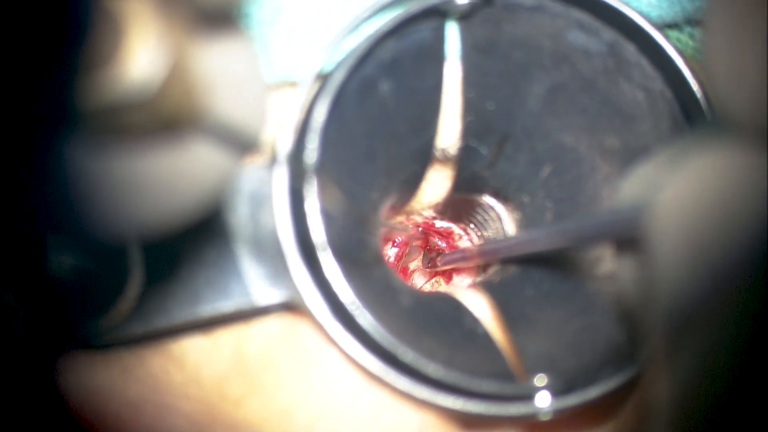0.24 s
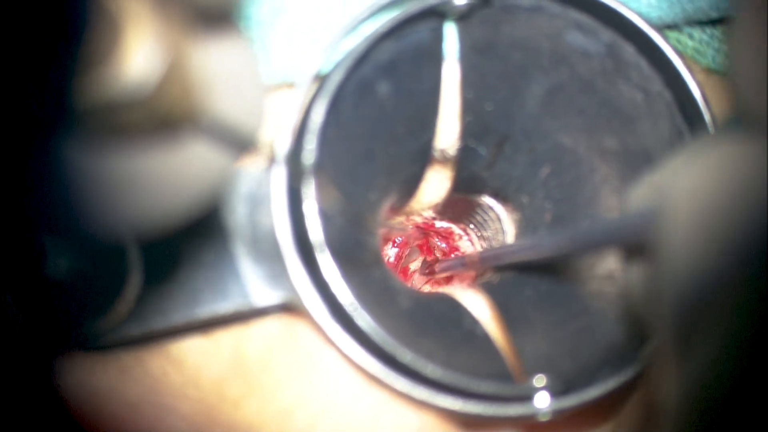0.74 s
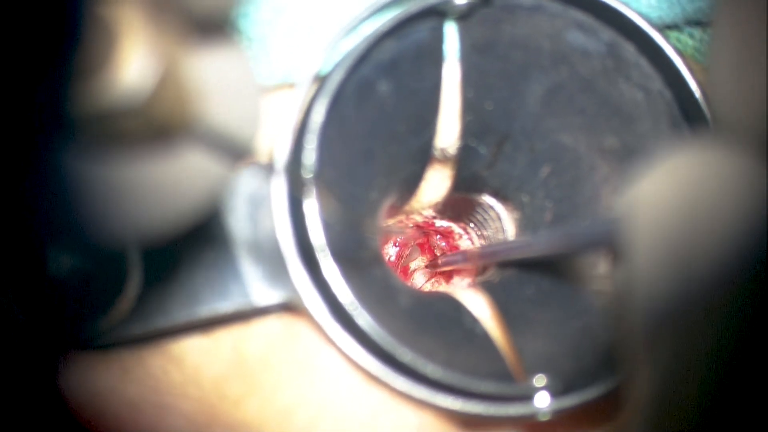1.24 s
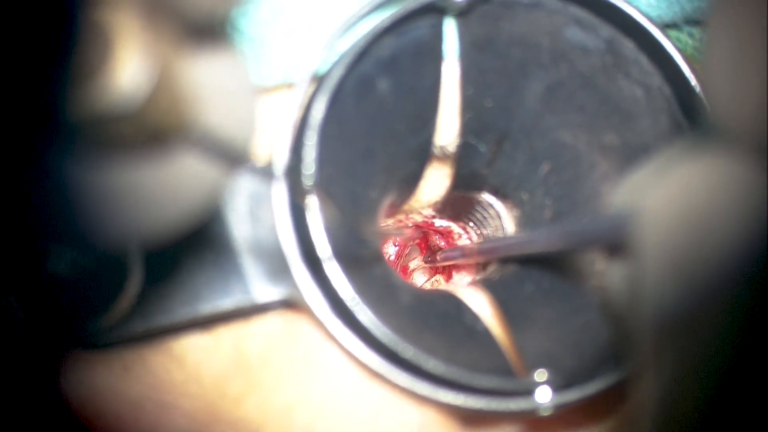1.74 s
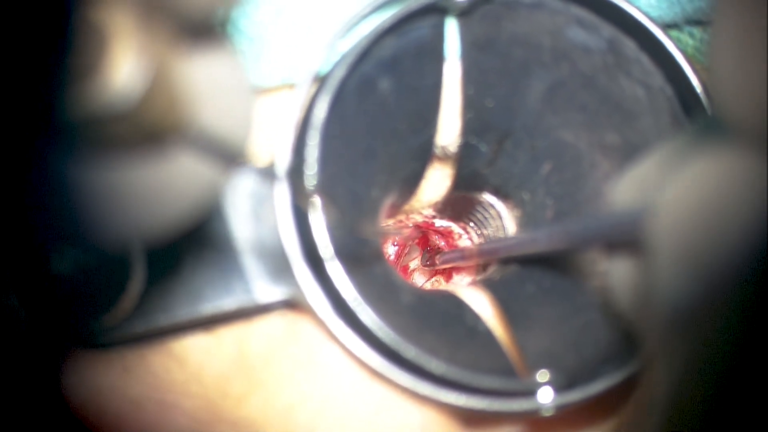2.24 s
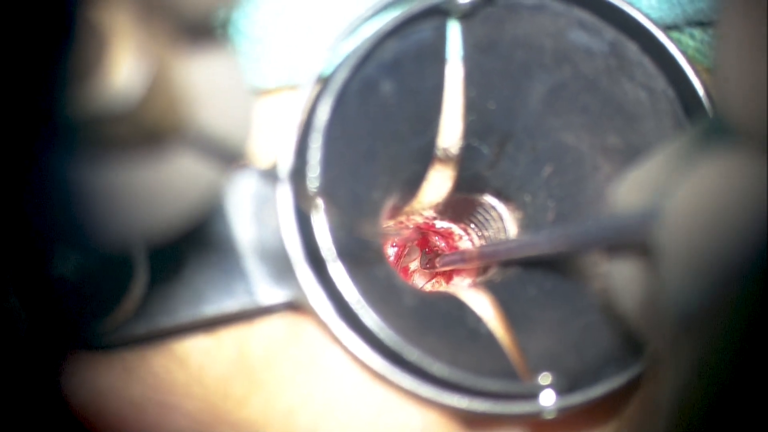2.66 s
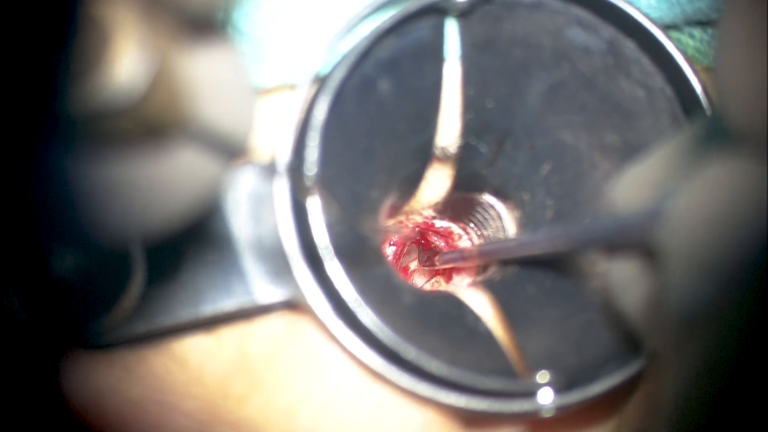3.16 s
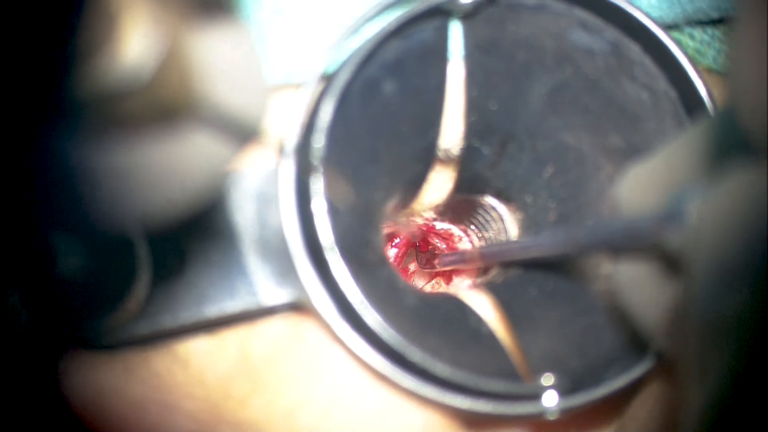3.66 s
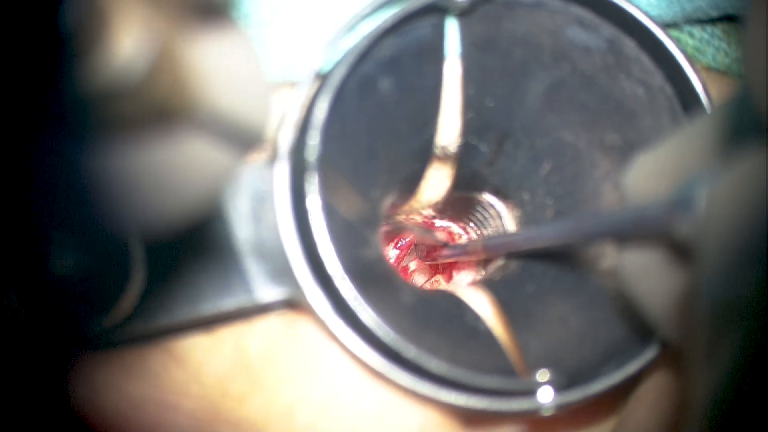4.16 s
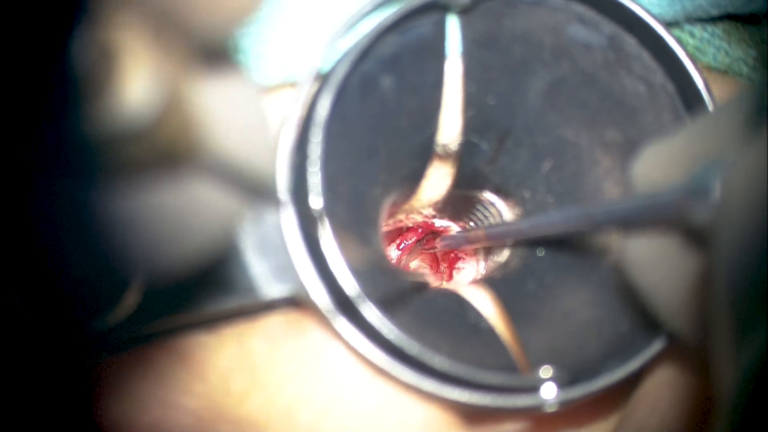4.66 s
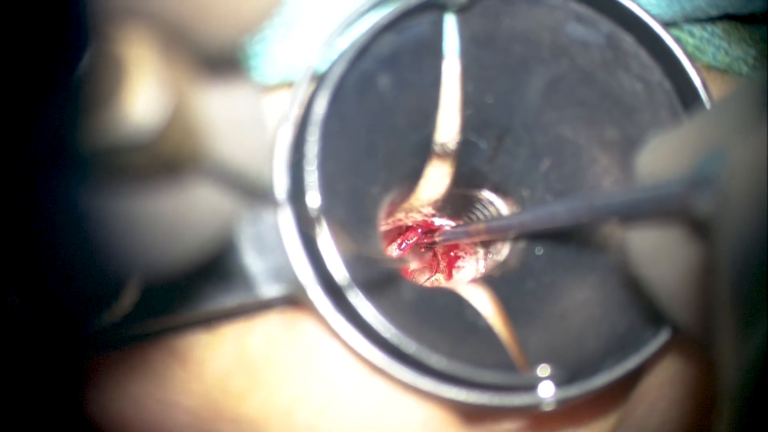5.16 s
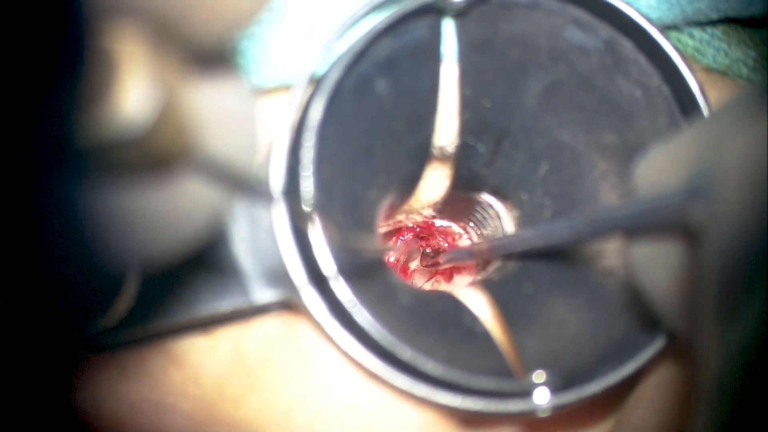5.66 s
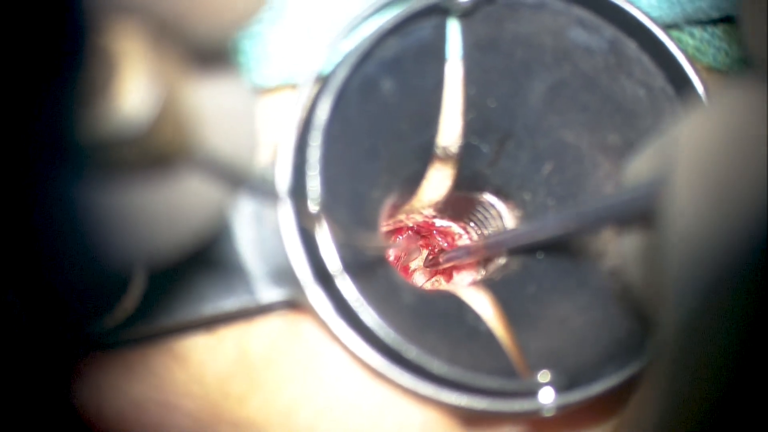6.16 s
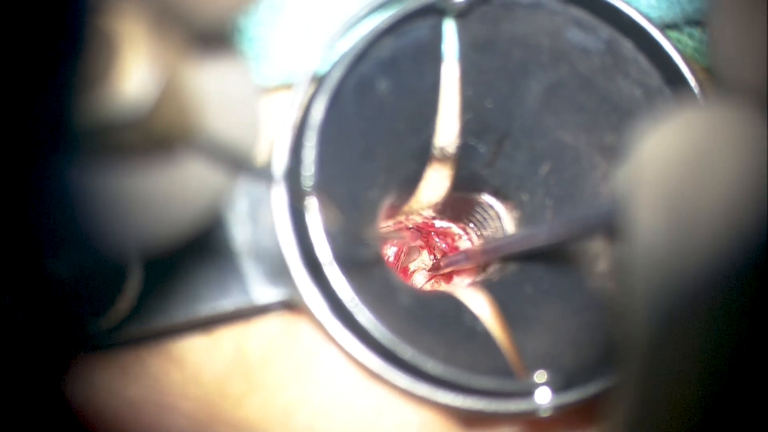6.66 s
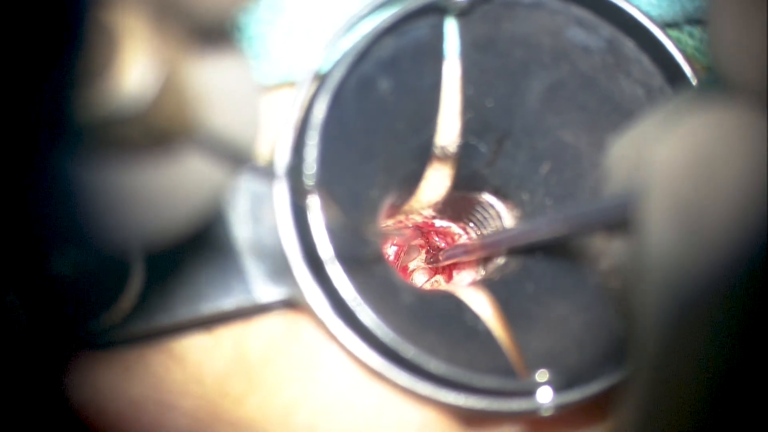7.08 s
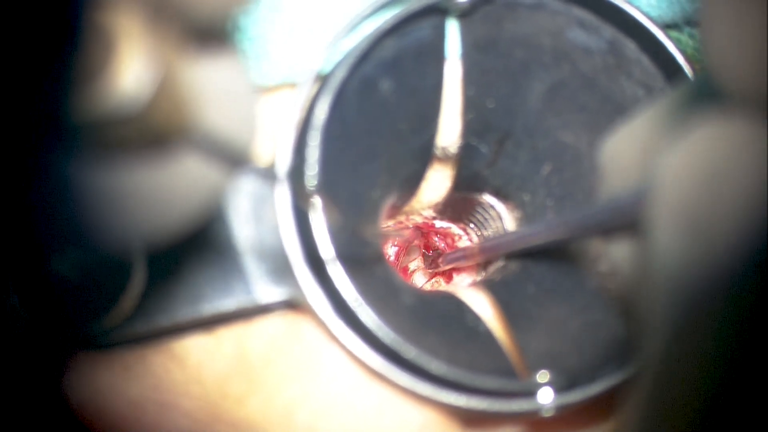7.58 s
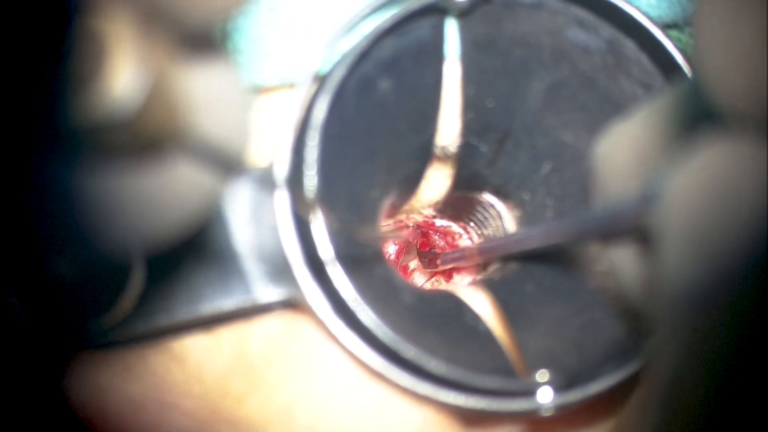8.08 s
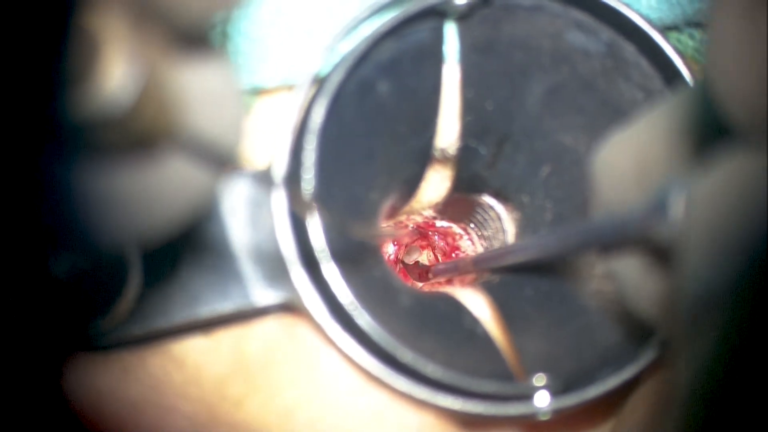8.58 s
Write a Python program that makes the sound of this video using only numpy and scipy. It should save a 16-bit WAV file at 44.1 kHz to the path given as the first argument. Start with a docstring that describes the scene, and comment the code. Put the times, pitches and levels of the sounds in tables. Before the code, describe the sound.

A thin surgical suction tube hisses in irregular close-up bursts, with wet snaps, ticks, brief whistles and soft thumps over steady room ventilation.

```python
"""Suction tube in an ear canal

A thin steel suction tube works in an ear canal, heard from very close by in an operating room.
Noise through resonances that change with how the tip sits makes the hiss; narrow gliding noise whistles.
Low coloured noise makes the rush of each draw; resonated random drops spatter.
Dying sines and noise puffs snap, pressure steps tick and low sines thump over steady ventilation."""
import sys
import numpy as np
from scipy import signal
from scipy.fft import rfft, irfft, next_fast_len
from scipy.io import wavfile
from scipy.ndimage import uniform_filter1d

SR = 44100
rng = np.random.default_rng(int(sys.argv[2]) if len(sys.argv) > 2 else 0)


def store_pcm(level_fs):
    """Save levels as 16-bit WAV."""
    pcm = np.round(np.clip(level_fs, -1, 1) * 32767).astype(np.int16)
    wavfile.write(sys.argv[1], SR, np.atleast_2d(pcm).T)


N = 388962
TINY = 1e-18  # keeps recursive filters clear of denormals


def from_db(db):
    """Decibels to amplitude gain."""
    return 10 ** (np.asarray(db) / 20)


def rms_one(x):
    """Scale to unit power."""
    return x / np.sqrt(np.mean(x ** 2) + 1e-20)


def cut(x, hz, kind, order=2):
    """Butterworth low- or high-pass."""
    sos = signal.butter(order, min(hz, .45 * SR), kind, fs=SR, output="sos")
    return signal.sosfilt(sos, x)


def drift(rate_hz):
    """Low-passed noise, rms 1; the filter settles for 1 s first."""
    return rms_one(cut(rng.standard_normal(N + SR), rate_hz, "low")[SR:])


def coloured_noise(spectrum):
    """Noise shaped by a spectrum, high-passed at 16 Hz, rms 1."""
    hz, density_db = np.transpose(spectrum)
    size = next_fast_len(N)
    bins_hz = np.maximum(np.arange(size // 2 + 1) * SR / size, 1)
    gain = from_db(np.interp(np.log(bins_hz), np.log(hz), density_db))
    noise = irfft(rfft(rng.standard_normal(size)) * gain, size)[:N]
    return rms_one(cut(noise, 16, "high"))


def resonate(x, hz, width_hz):
    """Two-pole resonance with gain 1 at its top."""
    r = np.exp(-np.pi * width_hz / SR)
    b = np.array([1, 0, -1]) * (1 - r * r) / 2
    a = [1, -2 * r * np.cos(2 * np.pi * hz / SR), r * r]
    return signal.lfilter(b, a, x)


def ring(t, hz, t60_s):
    """Sine that dies by 60 dB in t60_s."""
    return np.sin(2 * np.pi * hz * t) * from_db(-60 * t / t60_s)


def add(track, start_s, sound):
    """Mix a sound into the track from start_s on."""
    start = max(round(start_s * SR), 0)
    track[start:start + len(sound)] += sound[:max(N - start, 0)]


# ventilation spectrum: hz, density_db (relative, per Hz)
VENTILATION = [(12, -39), (20, -0.5), (63, -4.5), (153, -11.5), (203, -8), (227, -13), (254, -8.5),
               (408, -7.5), (456, -13), (524, -12), (1180, -14.5), (1510, -18.5), (1690, -19), (2500, -26),
               (15800, -32.5)]
# swell of the low rumble: time_s, gain_db
RUMBLE = [(0, -2.5), (.45, -7), (.75, 2), (3.3, -0.5), (5.2, 3.5), (7.0, 1.5), (8.82, 2)]


def ventilation(level_db, rumble_hz, waver_db):
    """Steady air handling as coloured noise; below rumble_hz it swells and sinks."""
    air = from_db(level_db) * coloured_noise(VENTILATION)
    time_s, gain_db = np.transpose(RUMBLE)
    swell_db = np.interp(np.arange(N) / SR, time_s, gain_db) + waver_db * np.tanh(drift(3.4))
    rumble = cut(air, rumble_hz, "low", order=3) * from_db(swell_db)
    return cut(air, rumble_hz, "high", order=3) + rumble


# air drawn each time the tip comes clear: start_s, length_s, opening_s, closing_s, hiss_db,
# swell_db (start to end), treble_db (relative to hiss), rush_db (low turbulence)
DRAWS = [(0.468, 0.08, 0.0066, 0.025, -59, 3, -9, -72), (0.675, 0.057, 0.008, 0.025, -55.5, -1, -7, -66),
         (0.717, 0.1, 0.02, 0.02, -65, 0, -5, -68), (0.793, 0.13, 0.055, 0.041, -42.6, -4, 2, -49.5),
         (0.883, 0.23, 0.19, 0.043, -40.5, 10.5, 5.5, -54.8),
         (1.088, 0.15, 0.03, 0.041, -36.5, -10, 8.5, -41), (1.275, 0.065, 0.0055, 0.03, -52, -18, -3, -52),
         (1.332, 0.11, 0.022, 0.025, -42.5, 16, 0.5, -45.5), (1.407, 0.22, 0.068, 0.046, -32.5, 3, 1, -41),
         (1.616, 0.088, 0.014, 0.033, -44.3, 13, -0.5, -44.5),
         (1.662, 0.23, 0.055, 0.045, -36, 18.5, 2.5, -39),
         (1.872, 0.26, 0.072, 0.086, -38.9, 2, 0.3, -41.5), (2.104, 0.068, 0.008, 0.013, -61, 6, 2, -58.3),
         (2.162, 0.047, 0.0038, 0.024, -33, 19, 5.5, -38),
         (2.191, 0.051, 0.019, 0.0095, -32.5, -6, 1, -32.5),
         (2.237, 0.142, 0.007, 0.012, -56, -7.5, -1.5, -48),
         (2.44, 0.073, 0.006, 0.049, -58, 6, -0.2, -49.5),
         (2.503, 0.28, 0.0032, 0.091, -43, -18, -3.5, -44),
         (2.689, 0.23, 0.076, 0.049, -37.0, 6, -3.5, -41),
         (2.885, 0.14, 0.052, 0.032, -33.5, -19, 1.9, -40), (3.225, 0.26, 0.15, 0.014, -48.5, 10, 1.5, -57),
         (3.457, 0.057, 0.013, 0.037, -38, 6.1, 7, -45),
         (3.501, 0.16, 0.026, 0.012, -38.5, -8.5, 1.6, -51.5),
         (3.619, 0.17, 0.061, 0.058, -41.5, -4.4, 7, -50.5), (3.753, 0.075, 0.01, 0.012, -53.5, -2, 2, -62),
         (3.797, 0.058, 0.005, 0.025, -45, -4, 3, -54), (3.849, 0.058, 0.003, 0.012, -55, -5, 1.4, -57),
         (3.888, 0.16, 0.098, 0.016, -38.5, 4, 2.5, -47.9), (4.04, 0.19, 0.013, 0.098, -42, 10, 5.5, -53.5),
         (4.215, 0.38, 0.14, 0.242, -41.5, -10.5, 0, -49), (4.568, 0.15, 0.042, 0.015, -50.5, -2, -4, -57),
         (4.683, 0.15, 0.096, 0.033, -39.5, -21, -1, -60), (4.823, 0.06, 0.027, 0.03, -37.5, 6, 0.5, -48),
         (4.859, 0.33, 0.032, 0.14, -37.5, 8, 2.5, -50.5), (5.186, 0.033, 0.011, 0.011, -58, 0, 2, -59),
         (5.205, 0.34, 0.021, 0.082, -44, -5.5, 2.5, -55), (5.483, 0.25, 0.009, 0.15, -42.5, 5, -5.5, -60),
         (5.666, 0.072, 0.016, 0.015, -42, 2, -4.5, -59),
         (5.708, 0.17, 0.066, 0.034, -41, -11.2, -7.5, -58),
         (5.826, 0.16, 0.035, 0.056, -45, 3.5, -9.5, -63),
         (5.972, 0.41, 0.034, 0.012, -62, -17, -5.5, -63.6), (6.347, 0.13, 0.09, 0.03, -52.5, 6, -6, -70),
         (6.494, 0.26, 0.107, 0.08, -52, 3.9, -6.5, -60.4),
         (7.406, 0.11, 0.022, 0.055, -54, -2.5, -7, -61.5),
         (7.859, 0.092, 0.066, 0.02, -49.5, 12.2, -11, -59),
         (8.019, 0.24, 0.042, 0.023, -42, -5.5, 3.4, -61),
         (8.241, 0.072, 0.029, 0.01, -42, -15.0, 3.5, -49), (8.299, 0.069, 0.018, 0.027, -39, -3, 0.5, -52),
         (8.343, 0.39, 0.033, 0.096, -41.5, -8, 1.2, -47.5)]
HISS_LAW, TREBLE_LAW, RUSH_LAW = 1.45, 2.03, 1.4  # amplitude grows as this power of the gap
LEAK_HISS_DB, LEAK_TREBLE_DB, LEAK_RUSH_DB = -72, -73, -66  # air seeping in between draws


def airflow():
    """The gap opens, holds and closes on each draw; gives hiss, treble and low rush in dB."""
    t = np.arange(N) / SR
    leaks_db = (LEAK_HISS_DB, LEAK_TREBLE_DB, LEAK_RUSH_DB)
    hiss_power, treble_power, rush_power = (np.full(N, from_db(db) ** 2) for db in leaks_db)
    for start_s, length_s, opening_s, closing_s, hiss_db, swell_db, treble_db, rush_db in DRAWS:
        age_s = t[t < length_s]
        gap = np.clip(np.minimum(age_s / opening_s, (length_s - age_s) / closing_s), 0, 1)
        swell = from_db(swell_db * (age_s / length_s - .5))
        add(hiss_power, start_s, (swell * from_db(hiss_db) * gap ** HISS_LAW) ** 2)
        add(treble_power, start_s, (swell * from_db(hiss_db + treble_db) * gap ** TREBLE_LAW) ** 2)
        add(rush_power, start_s, (swell * from_db(rush_db) * gap ** RUSH_LAW) ** 2)
    return 10 * np.log10([hiss_power, treble_power, rush_power])


def gurgle(hiss_db, low_db, depth_db, per_s, relax_s, dry_db):
    """Fluid films burst in the opening: flow jumps and relaxes, more as low rush outweighs hiss."""
    wet = np.clip(0.5 - (hiss_db - low_db) / dry_db, 0, 1)
    bursts = rng.uniform(.5, 1, N) * (rng.random(N) < per_s / SR)
    decay = np.exp(-1 / (relax_s * SR))
    surge = np.tanh(signal.lfilter([1], [1, -decay], bursts + TINY))
    return depth_db * wet * rms_one(surge - surge.mean())


def tube_noise(modes, broad_db, low_hz, size, shift_pct=0):
    """Eddies at the tip drive each resonance, steep-sided; some of their rush escapes uncoloured."""
    out = from_db(broad_db) * rng.standard_normal(size)
    for hz, width_hz, gain_db in modes:
        centre_hz = hz * (1 + shift_pct / 100)
        once = resonate(rng.standard_normal(size), centre_hz, width_hz)
        out = out + from_db(gain_db) * resonate(once, centre_hz, width_hz)
    return cut(out, low_hz, "high", order=4)


# resonances of tube and ear canal for each way the tip sits: hz, width_hz, gain_db
FREE = [(2200, 235, 6.5), (2545, 590, 10), (3850, 890, -1.5), (4750, 820, -2.5), (5155, 300, 3.5),
        (6550, 450, -15), (8320, 900, -15.5), (9500, 1300, -20), (10180, 370, -21.5), (12000, 630, -20.5),
        (13000, 800, -21)]
DIPPED = [(2020, 500, -4), (2436, 500, 0.5), (3475, 850, -6), (4940, 460, -4), (6850, 1300, -12),
          (8550, 3000, -3), (9700, 2000, -14), (12080, 1500, -6.5), (13020, 750, 5), (15600, 900, -7)]
PRESSED = [(1900, 355, -2), (3650, 1900, -6), (5130, 880, -1), (6800, 1500, -2.5), (8510, 1700, 0.5),
           (9440, 3100, -2), (12700, 1100, -7), (13300, 1300, 7), (15300, 1800, -4)]
GRAZING = [(1874, 150, 2.5), (2220, 540, -5), (3950, 2000, -7), (5350, 400, -5), (6760, 840, -5.5),
           (8340, 1300, 0), (9830, 2000, -2.5), (12250, 1000, -2), (13550, 800, -0.5), (15400, 1200, -12)]
CUPPED = [(1890, 390, 3), (3960, 1100, -6.5), (5230, 720, 2), (6860, 1700, -2), (8200, 800, -3),
          (9700, 1000, -3.5), (12500, 900, -9), (13300, 590, 5), (15300, 1300, -11)]
PINCHED = [(2080, 460, -29), (4600, 1400, -6), (5600, 800, -6.5), (6700, 1300, -5), (8300, 510, 11),
           (9300, 900, 2), (11700, 1500, -3), (13500, 1500, -2), (15600, 800, -17)]


def seat_noise(modes, shift_pct, size):
    """Tube noise with the uncoloured rush and low edge of each way the tip sits."""
    if modes is FREE:
        return tube_noise(modes, -32.0, 1330, size, shift_pct)
    if modes is DIPPED:
        return tube_noise(modes, -15.0, 1900, size, shift_pct)
    if modes is PRESSED:
        return tube_noise(modes, -18.5, 840, size, shift_pct)
    return tube_noise(modes, -10.0, 1350, size, shift_pct)


# how the tip sits from each moment on: start_s, resonances, shift_pct (upward)
SEATING = [(0, GRAZING, -0.13), (1.02, PINCHED, -0.47), (1.224, PRESSED, 0.78), (1.519, DIPPED, 0.25),
           (2.17, PRESSED, -1.5), (2.451, PRESSED, -0.83), (3.011, FREE, -0.34), (3.387, GRAZING, -0.36),
           (3.461, PINCHED, 1), (3.57, GRAZING, -0.24), (3.94, CUPPED, -0.25), (4.819, DIPPED, -.5),
           (5.33, FREE, -0.36), (7.0, FREE, 0.23), (8.2, DIPPED, 0.6), (8.35, FREE, 0.19)]


def hiss(hiss_db, treble_db, flutter_db, flutter_hz, treble_hz):
    """The intake jet: brighter as it speeds up, fluttering as fluid crosses the opening."""
    body, top = np.zeros(N), np.zeros(N)
    fade = SR // 60
    ends_s = [start_s for start_s, _, _ in SEATING[1:]] + [N / SR]
    for (start_s, modes, shift_pct), end_s in zip(SEATING, ends_s):
        size = max(round((end_s - start_s) * SR), fade) + fade
        air = seat_noise(modes, shift_pct, size)
        to_edge = np.minimum(np.arange(size), np.arange(size)[::-1])
        cross_fade = np.sqrt(np.minimum(to_edge / fade, 1))
        add(body, start_s, cross_fade * rms_one(cut(air, treble_hz, "low", order=7)))
        add(top, start_s, cross_fade * rms_one(cut(air, treble_hz, "high", order=7)))
    level = from_db(hiss_db + flutter_db * drift(flutter_hz))
    return level * (body + from_db(treble_db) * top)


# low rush and its bass: hz, density_db (relative, per Hz)
TURBULENCE = [(20, -15), (120, -8.5), (350, -2.5), (700, -5.5), (1000, -8), (1350, -5.5), (1700, -11.5),
              (2600, -26), (5000, -49)]
BUFFET = [(20, -14), (60, -4), (170, 0), (300, -7.5), (600, -10.5), (1500, -38.5)]


def turbulence(low_db, lumpy_db, buffet_from_db, buffet_growth, free_tip_db):
    """Unsteady draught gives a lumpy low rush; its bass grows faster, but is weaker at a free tip."""
    free = np.zeros(N)
    for start_s, modes, _ in SEATING:
        free[max(round(start_s * SR), 0):] = modes is FREE
    free = uniform_filter1d(free, size=900)
    buffet_db = low_db + buffet_growth * (low_db - buffet_from_db) + free_tip_db * free
    rush = from_db(low_db - 3.0 + lumpy_db * drift(58)) * coloured_noise(TURBULENCE)
    return rush + from_db(buffet_db) * coloured_noise(BUFFET)


def spatter(low_db, per_s, level_db):
    """Tiny drops crackle in the tube, the more of them the stronger the draught."""
    sizes = from_db(6 * np.minimum(rng.exponential(1, N), 3)) * rng.choice([-1, 1], N)
    wetness = np.clip((low_db + 58) / 15, 0, 1)
    drops = sizes * (rng.random(N) < wetness * per_s / SR) + TINY
    rings = np.zeros(N)
    for k, (hz, width_hz, gain_db) in enumerate(PRESSED):
        rings += (-1) ** k * from_db(gain_db) * resonate(drops, hz, width_hz)
    return from_db(low_db + level_db) * rms_one(cut(rings, 6000, "low"))


# whistles as the gap narrows: start_s, length_s, start_hz, end_hz, half_width_hz, peak_rms_db
WHISTLES = [(1.008, 0.016, 2240, 2410, 200, -41.5), (1.197, 0.017, 1950, 1940, 120, -36),
            (1.455, 0.047, 13800, 13500, 250, -36), (1.988, 0.085, 13100, 13100, 219, -38.5),
            (2.164, 0.035, 13150, 13200, 250, -26), (2.903, 0.055, 5200, 5210, 150, -32),
            (3.334, 0.042, 2234, 2740, 200, -48.5), (3.377, 0.03, 2500, 3710, 250, -50),
            (3.507, 0.031, 4100, 4200, 300, -38.5), (3.51, 0.036, 5400, 5320, 200, -40),
            (3.959, 0.045, 13450, 13400, 220, -33), (4.104, 0.061, 8500, 8300, 350, -38.5),
            (4.131, 0.061, 1960, 2100, 130, -45), (4.341, 0.027, 1940, 1955, 80, -40),
            (4.422, .06, 2420, 2150, 160, -50), (4.728, 0.051, 1960, 2000, 120, -55),
            (5.205, 0.1, 3500, 3650, 380, -40), (7.993, 0.024, 2450, 2450, 200, -48.5),
            (8.029, 0.032, 2396, 2540, 398, -39.5), (8.26, .08, 13000, 13400, 150, -49)]


def whistles():
    """The jet briefly locks onto one resonance: a narrow, breathy, gliding tone."""
    out = np.zeros(N)
    eddies = rng.standard_normal((len(WHISTLES), 2, SR // 4))
    for (start_s, length_s, start_hz, end_hz, half_width_hz, peak_rms_db), eddy in zip(WHISTLES, eddies):
        size = min(int(length_s * SR), SR // 5)
        phase = 2 * np.pi * np.cumsum(np.linspace(start_hz, end_hz, size)) / SR
        a, b = cut(eddy, half_width_hz, "low")[:, SR // 20:][:, :size]  # skips filter start-up
        swell = np.sin(np.linspace(0, np.pi, size))
        tone = rms_one(a * np.cos(phase) + b * np.sin(phase))
        add(out, start_s, from_db(peak_rms_db) * swell * tone)
    return out


# hose jerks when the flow stops or starts: start_s, level_db (before trim_db), pitch_hz
THUMPS = [(1.101, -25, 90), (1.116, -22, 130), (1.353, -19.5, 92), (1.392, -27, 110), (1.502, -17.5, 72),
          (1.833, -20, 109), (2.206, -13, 64), (2.507, -18.5, 106), (2.526, -14.5, 70), (2.786, -24, 142),
          (3.335, -41, 50), (3.465, -30, 89.5), (3.615, -33.5, 51), (4.779, -37, 70), (4.836, -28, 68),
          (5.052, -38, 52), (5.976, -38, 60), (6.135, -32.5, 100), (6.418, -38, 70.4), (6.715, -36, 54.7),
          (7.38, -42, 85), (7.976, -40, 79.6)]


def thumps(overtone, overtone_db, t60_cycles, trim_db):
    """The hose swings a few times after each jerk; its second mode dies sooner."""
    out, t = np.zeros(N), np.arange(SR // 4) / SR
    for start_s, level_db, pitch_hz in THUMPS:
        t60_s = t60_cycles / pitch_hz
        second = from_db(overtone_db) * ring(t, overtone * pitch_hz, t60_s / 2)
        add(out, start_s, -from_db(level_db + trim_db) * (ring(t, pitch_hz, t60_s) + second))
    return out


# fluid plugs snapping through the bore: start_s, ring_level_db, ring_hz,
# spray_db (relative to the ring, before spray_trim_db), spray_length_s
SNAPS = [(1.1186, -17, 5300, -2, 0.0026), (1.2090, -11, 4200, -1, .001), (1.2099, -4, 8360, -1, .0014),
         (1.2182, -13.5, 5640, -2, 0.0019), (1.2417, -28, 4100, 8, 0.0035), (1.284, -23.5, 2070, 0.5, .004),
         (1.3567, -17, 5250, 3, 0.0013), (1.3965, -9, 8200, -10, 0.0032), (1.4395, -23, 5300, 0, 0.001),
         (1.4585, -18.5, 5230, 3.5, .001), (1.5109, -3, 4190, -8, .001), (1.5290, -2, 2490, -5, .001),
         (1.5323, -13, 2470, 4, .003), (1.8349, 2, 8000, -1, .001), (2.1646, -19, 2500, 0, .002),
         (2.5072, -7, 6200, 2, .0011), (2.531, -21, 3280, 2, 0.0021), (2.878, -24, 8300, 5, 0.0013),
         (3.0293, -33, 2380, -11, 0.00089), (3.473, -34, 8450, 4, 0.0029), (3.525, -26, 5300, 1, 0.0044),
         (3.6164, -12, 13500, -4.5, 0.00088), (3.749, -31, 8300, 7, .0008), (4.306, -23.5, 1700, 2, 0.0025),
         (4.3195, -16, 5230, -10, .0009), (4.3331, -7.5, 8200, -1, .0014),
         (4.3614, -22.5, 1870, 2.5, .0011), (5.73, -30, 2636, -8, .001), (6.3795, -41, 2600, -5, 0.0025),
         (8.219, -35.5, 2630, 9, 0.0036), (8.329, -35, 2600, 5, 0.0065)]


def snaps(spray_trim_db, spray_top_hz, t60_cycles):
    """A plug lets go: the air column rings briefly under a sudden puff of spray."""
    out, t = np.zeros(N), np.arange(2048) / SR
    sprays = tube_noise(PRESSED, broad_db=-7.0, low_hz=870, size=len(SNAPS) * len(t))
    sprays = cut(sprays, spray_top_hz, "low").reshape(len(SNAPS), -1)
    for (start_s, level_db, ring_hz, spray_db, length_s), spray in zip(SNAPS, sprays):
        age = 2 * t / length_s
        swell = np.sqrt(2 * age * np.exp(1 - 2 * age))  # steep rise to 1, then a fall
        puff = swell * spray / np.sqrt(np.average(spray ** 2, weights=swell ** 2))
        column = ring(t, ring_hz, t60_cycles / ring_hz)
        add(out, start_s, from_db(level_db) * (column + from_db(spray_db + spray_trim_db) * puff))
    return out


# droplets breaking off: start_s, level_db (step height before filtering)
TICKS = [(1.126, -16), (1.16, -22), (1.2174, -15.5), (1.2417, -18), (1.3092, -26.5), (1.3375, -28),
         (1.3905, -17), (1.4155, -28), (1.437, -21), (1.4570, -24), (1.479, -19), (1.583, -31), (1.834, -4),
         (2.1818, -24), (2.5075, -8), (3.002, -29), (3.0297, -28.5), (3.0921, -32.5), (3.976, -26),
         (3.9878, -16.5), (4.039, -31), (4.3334, -20), (4.398, -22), (4.4332, -29), (4.4719, -21.5),
         (4.4736, -30), (4.5216, -29.5), (4.6895, -23.5)]


def ticks(decay_s, low_hz, top_hz):
    """Each droplet is a one-sided pressure step that relaxes at once, dulled by a low-pass."""
    out, t = np.zeros(N), np.arange(512) / SR
    for start_s, level_db in TICKS:
        add(out, start_s, from_db(level_db) * np.exp(-t / decay_s))
    return cut(cut(out + TINY, low_hz, "high", order=1), top_hz, "low", order=1)


def scene():
    """Suction noises over the ventilation."""
    room = ventilation(level_db=-55, rumble_hz=141.9, waver_db=5.0)
    hiss_db, treble_db, low_db = airflow()
    sputter_db = gurgle(hiss_db, low_db, depth_db=1.9, per_s=110, relax_s=0.005, dry_db=21.5)
    jet = hiss(hiss_db + sputter_db - 0.26, treble_db - hiss_db,
               flutter_db=1.43, flutter_hz=90, treble_hz=7000)
    draught = turbulence(low_db + sputter_db, lumpy_db=3.5, buffet_from_db=-30.5,
                         buffet_growth=0.26, free_tip_db=-20)
    drops = spatter(low_db, per_s=110, level_db=-18.0)
    hose = thumps(overtone=1.99, overtone_db=-3, t60_cycles=7, trim_db=-4.5)
    plugs = snaps(spray_trim_db=-7.5, spray_top_hz=9600, t60_cycles=24)
    droplets = ticks(decay_s=.0005, low_hz=130, top_hz=2800)
    return (room + jet + draught + drops + whistles() + hose + plugs + droplets)[None]


def record(dry):
    """Clip at full scale, then cut the top steeply at 15.8 kHz."""
    sos = signal.ellip(10, .2, 70, 15800, fs=SR, output="sos")
    return signal.sosfilt(sos, np.clip(dry, -1, 1))


dry = scene()
out = record(dry)
store_pcm(out)
```